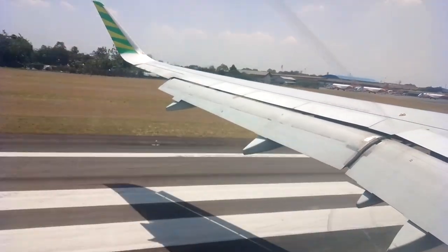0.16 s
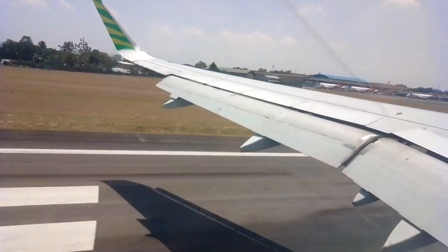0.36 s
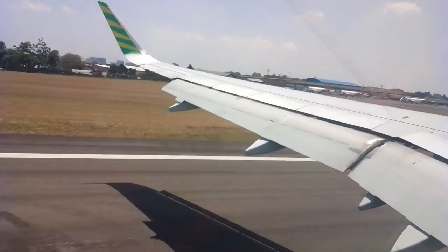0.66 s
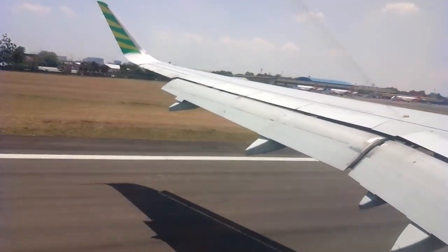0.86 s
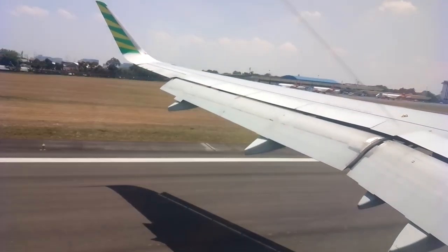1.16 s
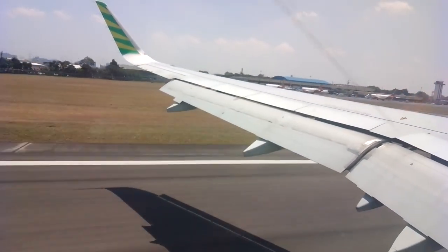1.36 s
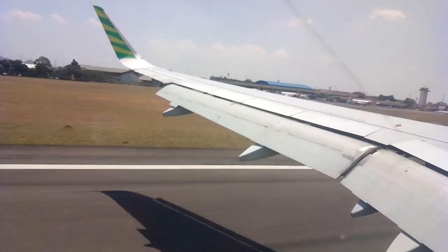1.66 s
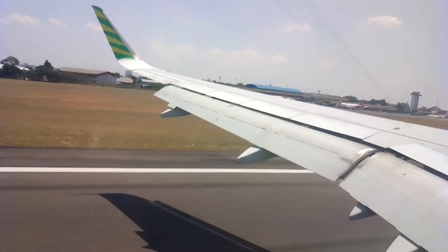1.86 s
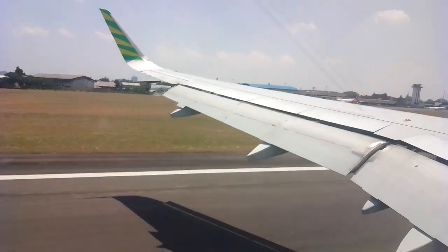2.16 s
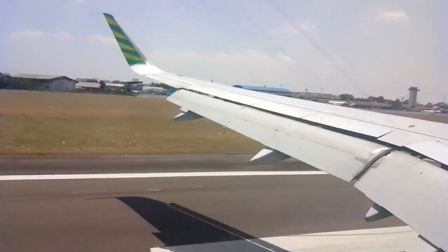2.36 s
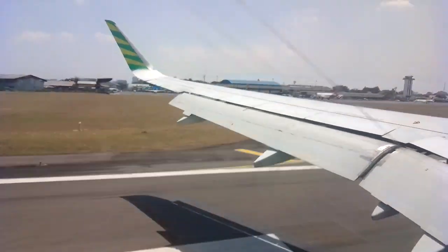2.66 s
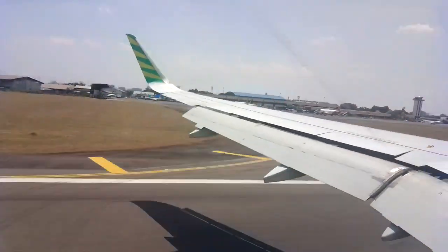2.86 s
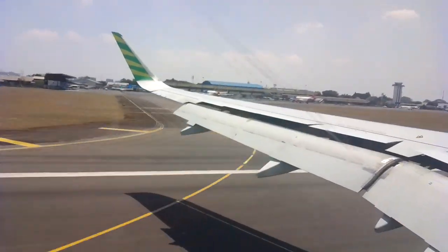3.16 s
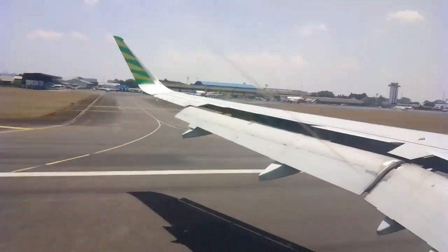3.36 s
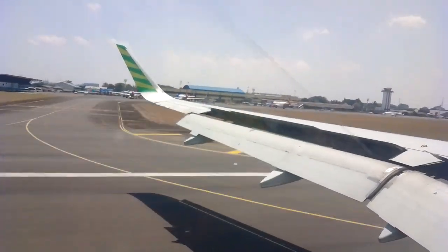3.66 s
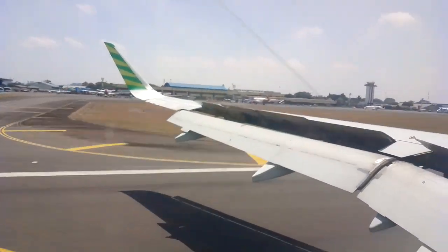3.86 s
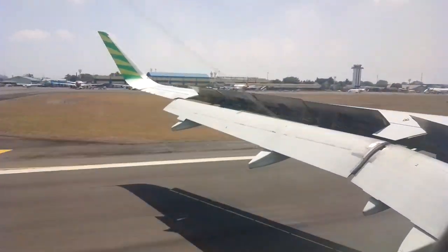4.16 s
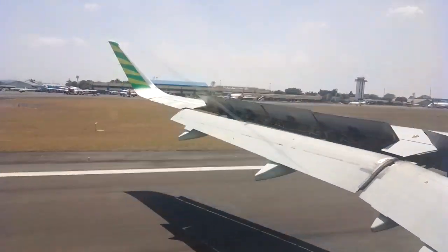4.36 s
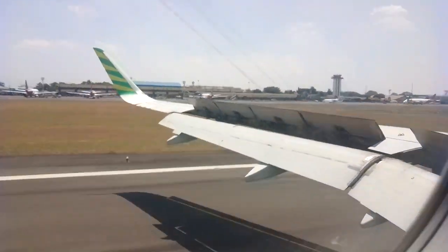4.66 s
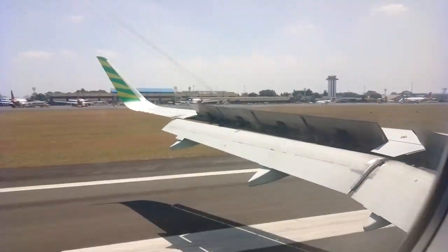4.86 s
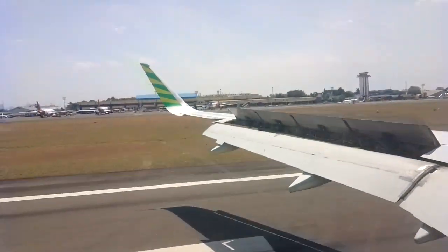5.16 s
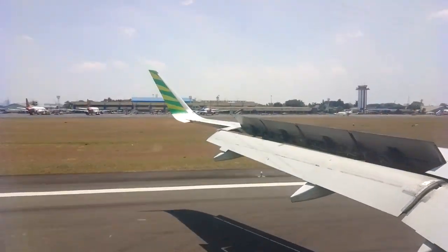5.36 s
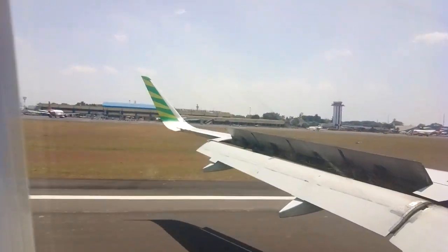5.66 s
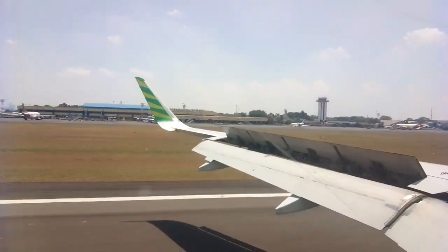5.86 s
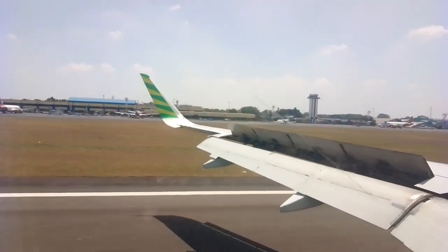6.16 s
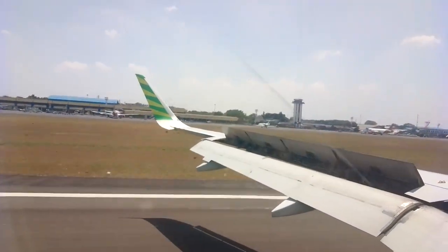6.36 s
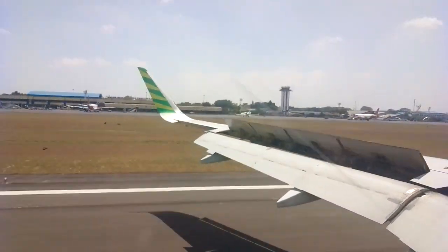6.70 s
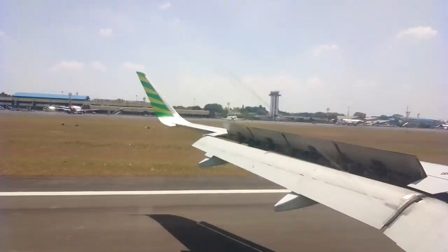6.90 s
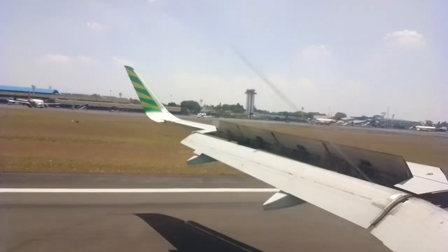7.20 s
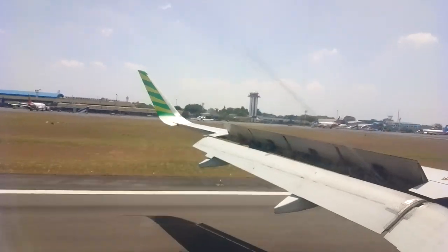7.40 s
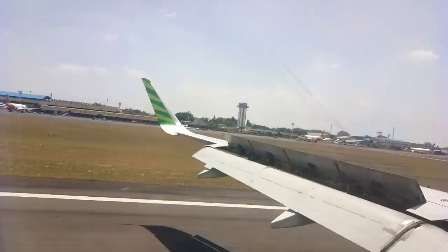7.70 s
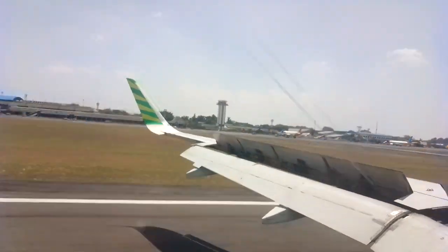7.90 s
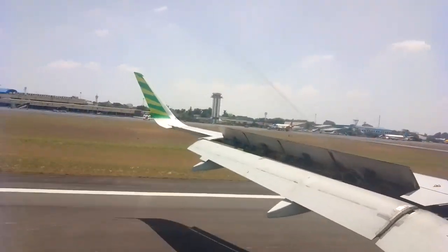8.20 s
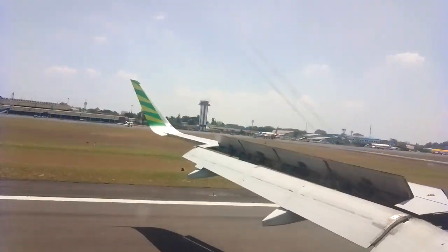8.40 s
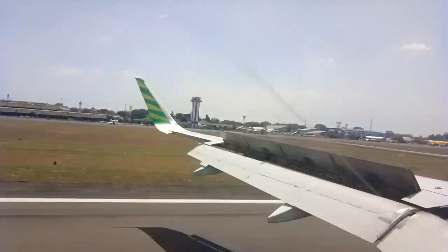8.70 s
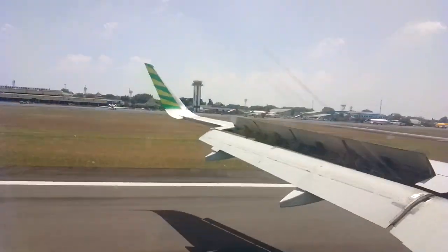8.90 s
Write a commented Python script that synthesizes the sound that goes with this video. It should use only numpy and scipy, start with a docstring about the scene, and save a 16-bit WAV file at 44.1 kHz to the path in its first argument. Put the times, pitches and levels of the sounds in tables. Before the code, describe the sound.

Continuous bass-heavy engine noise fills a jet cabin during the landing roll. Loose trim ticks, clacks and clatters, sparsely at first, then densely from two to five and a half seconds while the airframe throbs rapidly. Knocks thin out as reverse thrust builds a broad, rougher mid-range roar. A faint whistle and high vent hiss sit underneath; the handheld-style microphone overloads on the loud lows.

```python
"""Airliner cabin around touchdown

At the window over the wing, filtered noise gives a jet roar that swells with reverse thrust, a wheel rumble
and a hiss; narrow resonances whistle. The airframe shudders, which swings roar, hiss and steady rattle.
Jolts rattle loose fittings as bursts of noise, and knocks ring the modes of the plastic trim.
The loud bass overloads the microphone, a soft limiter that squashes most of the treble along with it."""
import sys
import numpy as np
from scipy import signal
from scipy.fft import rfft, irfft, next_fast_len
from scipy.io import wavfile
from scipy.ndimage import uniform_filter1d

SR = 44100
rng = np.random.default_rng(int(sys.argv[2]) if len(sys.argv) > 2 else 0)


def wrap_up_sound(samples):
    """Save the sound to the file named by the first command line argument, as 16-bit audio."""
    columns = np.atleast_2d(samples).T
    # keep every value between -1 and 1, then stretch to whole-number steps
    tamed = np.clip(columns, -1, 1)
    steps = np.round(tamed * 32767).astype(np.int16)
    wavfile.write(sys.argv[1], SR, steps)


N = 398663

# Levels over time, before shudder and overload.
# Each row: time in seconds, wheel rumble in dB, jet roar in dB, airflow hiss in dB.
ROLL_LEVELS = [(0, -22, -14.5, -42), (1.25, -18, -16, -43), (1.55, -29, -15, -45),
               (2.0, -22.5, -15.5, -43.5), (2.25, -17, -16.5, -39.5), (2.8, -16.5, -17, -45.5),
               (3.9, -17, -15.5, -44.5), (5.2, -15.5, -15.5, -43.5), (5.6, -15, -15.5, -43.5),
               (6.6, -20, -11.5, -45.5), (7.3, -20.5, -8.5, -40.5), (7.9, -15.5, -7, -40),
               (8.3, -18.5, -7, -42.5), (8.6, -8.5, -7.5, -39.5), (8.8, -18, -6, -44),
               (9.04, -15.5, -6.5, -45.5)]
# Steady rattle of the fittings. Each row: time in seconds, level in dB.
SHAKE_LEVELS = [(0, -55), (2.0, -46.5), (2.3, -45.5), (2.7, -43.5), (4.0, -56.5), (4.7, -48.5),
                (5.3, -48.5), (6.7, -50.5), (7.8, -47.5), (9.04, -45.5)]
# Whistle of the air. Each row: time in seconds, level in dB.
WHISTLE_LEVELS = [(0, -60.5), (2.05, -56.5), (2.1, -59.5), (2.4, -61), (2.6, -61), (2.9, -59),
                  (3.05, -64.5), (3.9, -66), (4.1, -73), (9.04, -78.5)]
# Blast of the reverse thrust. Each row: time in seconds, level in dB.
REVERSE_LEVELS = [(0, -67), (5.6, -56.5), (6.3, -48), (6.8, -41), (7.3, -38.5), (7.9, -36.5), (8.5, -36),
                  (9.04, -35.5)]
# Longer spells of clatter. Each row: middle in seconds, rattle level in dB, half length in seconds.
CLATTER_SPELLS = [(0.202, -41, 0.036), (0.339, -43.5, .02), (0.736, -49, .02), (1.573, -42, 0.035),
                  (2.19, -41, 0.033), (2.276, -37.5, 0.021), (2.362, -39, 0.029), (2.44, -39, 0.026),
                  (2.534, -39.5, 0.048), (2.7, -53, 0.026), (3.312, -40, 0.039), (3.591, -41.5, 0.046),
                  (3.856, -40.5, 0.023), (3.951, -34.5, 0.011), (4.05, -38, 0.013), (4.124, -42.5, 0.029),
                  (4.207, -40.5, .02), (4.3, -37, 0.038), (4.401, -39.5, .03), (4.655, -40.5, 0.016),
                  (4.7, -43.5, .04), (4.805, -42.5, .02), (4.892, -39.5, 0.015), (4.973, -40.5, .015),
                  (5.057, -39, 0.028), (5.15, -42, 0.035), (5.226, -34.5, 0.028), (5.427, -42, 0.01),
                  (5.546, -41.5, .015), (6.064, -43.5, .02), (8.065, -43.5, 0.053)]

# Relative noise spectra. Each row: frequency in Hz, level in dB per Hz.
RUMBLE_SPECTRUM = [(20, -36.5), (35, -14), (50, -4), (62, -6), (80, -8.5), (110, -16.5), (200, -35.5)]
ROAR_SPECTRUM = [(24, -39.5), (40, -5.5), (70, -6), (93, -5), (189, 1.5), (238, -5.5), (290, -4.5),
                 (417, -18.5), (563, -30.5), (667, -28.5), (750, -35), (811, -35), (900, -35.5),
                 (1170, -64.5), (1980, -120)]
HISS_SPECTRUM = [(260, -38), (450, -1), (573, -19.5), (687, -10), (775, -19), (987, -5), (1320, -22),
                 (1540, -14), (1840, -19), (2060, -15), (3310, -28), (4090, -32), (5000, -48), (6500, -70),
                 (11000, -120)]
RATTLE_SPECTRUM = [(300, -23), (600, 3), (1000, -0.5), (2000, -6), (3000, -11), (4600, -21.5),
                   (6000, -32.5), (6900, -33.5), (7700, -26.5), (8800, -35.5), (10000, -36), (12000, -39.5),
                   (13500, -43.5), (15000, -38), (17000, -32.5)]
VENT_SPECTRUM = [(3000, -23), (4600, 4), (5300, -3.5), (6000, -5.5), (6900, -8.5), (7700, -9),
                 (8800, -15.5), (10000, -16), (12000, -29), (13500, -22), (15000, -17.5), (17000, -16.5)]
BLAST_SPECTRUM = [(350, -34), (500, -5.5), (700, -3.5), (1000, -10), (1400, -12), (2000, -14.5),
                  (3000, -27), (4500, -45.5), (6000, -67.5)]

# Whistling bands. Each row: centre in Hz, width of each of two filter passes in Hz, relative level in dB.
WHISTLE_BANDS = [(4083, 280, -1), (6440, 150, -22.5), (7300, 460, -20.5)]
# Knocks on the trim. Each row: start in seconds, peak of the body in dB, pitch that favours the modes in Hz,
# peak of the treble crack in dB, contact length in seconds, spread (6 dB down) in octaves.
TRIM_KNOCKS = [(0.021, -20.5, 2100, -57, 0.0015, 0.56), (0.191, -24.5, 1600, -60, 0.003, 1.2),
               (0.194, -32, 2320, -63, 0.025, 0.61), (0.322, -22, 1980, -69, 0.0012, 0.66),
               (0.398, -29, 1500, -51, 0.002, 0.99), (0.583, -32, 1670, -62, 0.004, 0.33),
               (0.705, -30, 2040, -71, 0.031, 0.33), (0.717, -24.5, 800, -70, 0.025, 0.37),
               (1.4765, -20, 2680, -40, 0.0012, 0.29), (1.557, -33.5, 1900, -70, 0.011, 0.57),
               (1.575, -33.5, 2850, -61, 0.006, 0.7), (1.92, -16.5, 1750, -51, 0.0013, 0.66),
               (2.169, -21, 930, -60, 0.016, 0.4), (2.194, -21, 2000, -62, 0.0076, 0.6),
               (2.195, -22, 940, -70, 0.0093, 0.25), (2.211, -29, 970, -65, 0.026, 0.33),
               (2.263, -28, 1781, -57, 0.0058, 1.4), (2.292, -31, 1127, -54, 0.0031, 1.3),
               (2.322, -25, 2680, -45, 0.0024, 0.35), (2.35, -26, 1390, -52, 0.0023, 1.2),
               (2.4, -25.5, 2169, -56, 0.0025, 0.35), (2.442, -14, 2240, -58, 0.0011, 0.45),
               (2.436, -27, 350, -70, 0.001, 0.92), (2.46, -27.5, 2039, -53, 0.0044, 0.51),
               (2.544, -26, 1300, -60, 0.0064, 1.7), (2.605, -26, 1180, -57, 0.0026, 1.2),
               (2.624, -32, 3300, -64, 0.0027, 0.3), (2.6694, -6.5, 2000, -48, 0.0038, 0.99),
               (2.6700, -4, 265, -66, 0.001, 0.31), (2.671, -12, 900, -59, 0.009, 0.98),
               (2.678, -11.5, 1720, -47, 0.0031, 0.51), (2.746, -32.5, 1110, -54, 0.0084, 1.2),
               (3.06, -34, 950, -48, 0.0029, 0.9), (3.179, -34.5, 1200, -51, 0.0022, 0.77),
               (3.243, -26.5, 945, -54, 0.0066, 1.1), (3.304, -36, 3630, -62, 0.004, 0.22),
               (3.341, -22, 1836, -45, 0.0018, 0.89), (3.478, -26, 1001, -54, 0.0028, 0.75),
               (3.606, -30, 1350, -46, 0.0031, 1.0), (3.669, -23, 930, -48, 0.002, 0.68),
               (3.731, -33, 1300, -51, 0.0022, 0.89), (3.78, -23, 1990, -56, 0.0015, 0.5),
               (3.85, -29, 1000, -60, 0.0043, 1.2), (3.933, -21.5, 1840, -54, 0.0013, 0.64),
               (3.952, -31, 1640, -58, 0.011, 1.0), (3.96, -29, 1100, -57, 0.004, 1.1),
               (4.044, -27, 1130, -51, 0.01, 1.4), (4.114, -28, 1200, -64, 0.005, 1.0),
               (4.136, -20.5, 800, -49, 0.001, 1.5), (4.19, -27, 1760, -54, 0.016, 0.96),
               (4.253, -26, 1614, -61, 0.0012, 0.93), (4.29, -24, 1230, -52, 0.015, 1.3),
               (4.312, -26.5, 1670, -48, 0.0053, 1.15), (4.366, -25, 820, -52, 0.0024, 0.65),
               (4.412, -27, 1360, -59, 0.01, 1.3), (4.424, -26, 1200, -59, 0.002, 1.0),
               (4.495, -22.5, 800, -52, 0.0019, 1.34), (4.57, -37, 1500, -56, 0.0037, 1.0),
               (4.649, -29.5, 1040, -52, 0.0076, 0.92), (4.89, -33, 990, -48, 0.001, 1.1),
               (5.008, -23.5, 2050, -48, 0.0044, 0.82), (5.043, -32, 1362, -53, 0.0056, 1.1),
               (5.215, -24.5, 1550, -51, 0.025, 1.2), (5.259, -23.5, 1950, -63, 0.0018, 0.5),
               (5.299, -35.5, 2580, -67, 0.0069, 0.51), (5.428, -28, 1110, -65, 0.011, 1),
               (5.541, -33.5, 1370, -59, 0.012, 0.78), (5.546, -21.5, 700, -64, 0.003, 0.8),
               (5.863, -27, 1000, -52, 0.003, 1.2), (5.995, -13.5, 620, -52, 0.001, 1.1),
               (6.106, -32.5, 2020, -64, 0.002, 0.42), (6.187, -26.5, 1800, -63, 0.0016, 0.34),
               (6.247, -24, 1790, -62, 0.0017, 0.76), (6.326, -18.5, 800, -50, 0.0014, 1.04),
               (6.448, -28, 1950, -44, 0.0016, 0.81), (6.528, -32, 1403, -51, 0.0038, 1.4),
               (6.493, -27, 704, -68, 0.0035, 0.63), (6.675, -25, 900, -53, 0.002, 1.5),
               (6.773, -32, 2280, -64, 0.0039, 0.52), (6.831, -25.5, 1800, -53, 0.005, 0.7),
               (6.931, -38, 3900, -62, 0.003, 0.4), (6.994, -27, 2030, -68, 0.002, 0.6),
               (7.788, -25, 1510, -56, 0.0053, 1.0), (8.004, -38, 2530, -53, 0.0035, 1.0),
               (8.096, -32, 2500, -53, 0.0027, 0.87), (8.193, -30, 2480, -56, 0.0042, 0.84)]
# Nominal modes of the trim panels. Each row: frequency in Hz, relative level in dB, 60 dB decay in seconds.
TRIM_MODES = [(257, 4.5, 0.044), (398, -2.5, .035), (573, 2.5, 0.029), (758, 2, 0.051), (860, 1, 0.053),
              (1020, 5.5, 0.032), (1220, 2, 0.014), (1370, 0, 0.012), (1600, -1, 0.018), (1700, 3.5, 0.019),
              (2020, 6, 0.017), (2130, 3.5, 0.011), (2350, 2.5, 0.017), (2460, 3.5, 0.013),
              (2670, -1.5, 0.01), (2900, -8, 0.0083), (3280, -8.5, 0.0038), (3570, -6.5, 0.018),
              (3920, -12, .01), (4270, -11.5, .009), (4730, -10.5, 0.0065), (5130, -18, .008)]

VENT_DB = -69.5
JOLTS_PER_S, JOLT_DB, JOLT_T60_S, JOLT_RISE_S = 330, 2.5, 0.055, 0.0014
# fittings rattle on after each knock: drive relative to the knock's peak, smoothing, 60 dB decay
AFTER_DB, AFTER_RISE_S, AFTER_T60_S = -29.5, 0.0067, 0.023
# the airframe shudders after touchdown: rate, time of one crest, start, end, fade
SHUDDER_HZ, CREST_S, SHUDDER_FROM_S, SHUDDER_TO_S, SHUDDER_FADE_S = 11.4, 3.92, 2.13, 4.75, 0.23
ROAR_THROB_DB, HISS_THROB_DB, RATTLE_THROB_DB = 3.5, 1.8, 3
CRACK_HZ, CRACK_WIDTH_HZ = 7600, 1700
SHARP_S = 0.01  # a contact this long halves the first blow
TILT_DB = 4  # loss per octave: higher modes take less of the blow
SCRAPE_DB = -8  # toneless part of a knock against the ringing part
OVERLOAD, KNEE = 0.54, 9.2  # ceiling of the limiter, sharpness of its bend
BASS_TOP_HZ = 736  # the overload acts most fully below this
RIDE = 0.38  # share of the treble that escapes the overload
SHELF_HZ, SHELF_DB = 194, 3
MIC_HZ, TOP_HZ = 2.3, 15830  # low and high cutoff


def undb(db):
    """Logarithmic level: 20 dB is a factor of ten in amplitude."""
    return 10 ** (np.asarray(db) / 20)


def unit(x):
    """Normalisation by the root mean square."""
    return x / np.sqrt(np.mean(x ** 2))


def smooth_twice(x, length):
    """Moving average applied twice, which turns a step into a smooth slope."""
    return uniform_filter1d(uniform_filter1d(x, length), length)


def decay(x, t60_s):
    """Exponential decay: each impulse falls by 60 dB in t60_s."""
    return signal.lfilter([1], [1, -np.exp(-np.log(1000) / (t60_s * SR))], x)


def walk(rate):
    """Random modulation: levels held for 1 / rate seconds and smoothed, with a spread near 1."""
    held = int(SR / rate)
    levels = np.repeat(rng.standard_normal(N // held + 1), held)
    return 1.4 * smooth_twice(levels, held)[:N]


def curves(table):
    """Envelopes: amplitude over time, interpolated in dB between the rows."""
    s, *columns = np.transpose(table)
    return [undb(np.interp(np.arange(N) / SR, s, column)) for column in columns]


def coloured(points, flicker_db, rate):
    """Spectral shaping of white noise; each octave flickers in level independently."""
    size = next_fast_len(N)
    octaves = np.log2(np.maximum(np.arange(size // 2 + 1) * SR / size, 1))
    at, db = np.transpose(points)
    spectrum = undb(np.interp(octaves, np.log2(at), db, -120, -120))
    shaped = rfft(rng.standard_normal(size)) * spectrum
    out = 0
    for octave in range(int(np.log2(at[0])), int(np.log2(at[-1])) + 2):
        share = np.maximum(1 - np.abs(octaves - octave), 0)  # neighbouring bands sum to one
        out = out + irfft(shaped * share, size)[:N] * undb(flicker_db * walk(rate))
    return unit(out)


def resonance(x, hz, width_hz):
    """Resonance of two poles: a band-pass with gain 1 at the centre."""
    return signal.lfilter(*signal.iirpeak(hz, hz / width_hz, SR), x)


def shudder():
    """Amplitude modulation: a swing between -1 and 1 that fades in after touchdown and out again."""
    t = np.arange(N) / SR
    to_edge = np.minimum(t - SHUDDER_FROM_S, SHUDDER_TO_S - t)
    depth = np.clip(to_edge / SHUDDER_FADE_S + .5, 0, 1)
    return depth * np.cos(2 * np.pi * SHUDDER_HZ * (t - CREST_S))


def vent_hiss():
    """Broadband flow noise: a faint, steady hiss of high pitch."""
    return undb(VENT_DB) * coloured(VENT_SPECTRUM, 1.5, 22)


def whistle():
    """Flow resonance: air through narrow gaps sings in a few narrow bands."""
    air = rng.standard_normal(N)
    bands = 0
    for hz, width_hz, db in WHISTLE_BANDS:
        band = resonance(resonance(air, hz, width_hz), hz, width_hz)
        bands = bands + undb(db) * unit(band)
    return curves(WHISTLE_LEVELS)[0] * unit(bands) * undb(1.3 * walk(25))


def airflow_hiss(level):
    """Flow noise in the middle and upper range, its level modulated by the shudder."""
    return level * undb(HISS_THROB_DB * shudder()) * coloured(HISS_SPECTRUM, 0.53, 13)


def rattle_level():
    """Envelope of the rattle: a steady part, longer spells and a decaying burst that each knock sets off."""
    s, peak_db = np.transpose(TRIM_KNOCKS)[:2]
    blows = np.zeros(N)
    blows[(s * SR).astype(int)] = undb(peak_db + AFTER_DB)
    bursts = uniform_filter1d(decay(blows, AFTER_T60_S), int(AFTER_RISE_S * SR) + 1)
    t = np.arange(0, N, 40) / SR  # a coarse grid is enough for slow humps
    spells = sum(undb(db) * np.exp(-((t - mid) / half) ** 2) for mid, db, half in CLATTER_SPELLS)
    spells = np.interp(np.arange(N) / SR, t, spells)
    steady = curves(SHAKE_LEVELS)[0] * undb(RATTLE_THROB_DB * shudder())
    return np.hypot(steady, spells + bursts)


def rattle():
    """Random impacts: runway bumps shake fittings in short broad bursts, a few much stronger."""
    strength = undb(JOLT_DB * rng.exponential(size=N))
    jolts = (rng.random(N) < JOLTS_PER_S / SR) * strength
    shake = smooth_twice(decay(jolts, JOLT_T60_S), int(JOLT_RISE_S * SR) + 1)
    return rattle_level() * unit(shake * coloured(RATTLE_SPECTRUM, 0.87, 11.0))


def knocks():
    """Modal excitation: a scrape of contacts is heard itself and rings panel modes, plus a treble crack."""
    out, t = np.zeros(N + SR), np.arange(SR // 12) / SR
    hz, db, t60 = np.transpose(TRIM_MODES)[:, :, None]
    for s, peak_db, pitch_hz, crack_db, length, spread in TRIM_KNOCKS:
        chance_db, detune = rng.standard_normal((2, len(TRIM_MODES), 1))
        contact = rng.standard_normal((2, len(t))) * np.exp(-(t / max(length, 1e-4)) ** 2)
        contact[0, 0] = 9.3 / (1 + length / SHARP_S)  # a hard first blow, softer in long scrapes
        # where the blow lands decides which modes sound
        distance = np.log2(hz / pitch_hz)
        gain = undb(db + chance_db - 6 * (distance / spread) ** 2 - TILT_DB * distance)
        tones = np.sin(2 * np.pi * hz * (1 + .03 * detune) * t)
        ring = np.sum(gain * tones * 1000. ** (-t / t60), axis=0)
        # plastic is soft: the push holds little far above the pitch
        soft_hz = pitch_hz * 2 ** (0.4 + spread * 0.77)
        push = signal.sosfilt(signal.butter(4, soft_hz, fs=SR, output="sos"), contact[0])
        body = signal.fftconvolve(push, ring)[:len(t)]
        wide_hz = 1.6 * pitch_hz * spread
        scrape = resonance(resonance(push, pitch_hz, wide_hz), pitch_hz, wide_hz)
        body = body / np.abs(body).max() + undb(SCRAPE_DB) * scrape / np.abs(scrape).max()
        crack = resonance(np.diff(contact[1], prepend=0), CRACK_HZ, CRACK_WIDTH_HZ)
        k = int(s * SR)
        out[k:k + len(t)] += undb(peak_db) * body / np.abs(body).max()
        out[k:k + len(t)] += undb(crack_db) * crack / np.abs(crack).max()
    return out[:N]


def wheel_rumble(level):
    """Rolling noise: wheels on the runway give low-frequency noise."""
    return level * coloured(RUMBLE_SPECTRUM, 0.33, 3.0)


def reverse_blast():
    """Jet noise of the reverse thrust: a mid-range band that grows as the thrust sets in."""
    return curves(REVERSE_LEVELS)[0] * coloured(BLAST_SPECTRUM, 0.72, 8.8)


def jet_roar(level):
    """Jet noise booming in the fuselage: bass peaks in its spectrum, modulated by the shudder."""
    return level * undb(ROAR_THROB_DB * shudder()) * coloured(ROAR_SPECTRUM, 0.9, 9)


def scene():
    """Superposition: the pressures of all sources add."""
    wheels, jets, hiss = curves(ROLL_LEVELS)
    air = vent_hiss() + whistle() + airflow_hiss(hiss)
    loose_parts = rattle() + knocks()
    cabin = wheel_rumble(wheels) + reverse_blast() + jet_roar(jets)
    return (air + loose_parts + cabin)[None]


def record(dry):
    """Saturation: bass peaks overload the input and squash most of the treble; both band ends are cut."""
    high = signal.butter(2, BASS_TOP_HZ, "high", fs=SR, output="sos")
    treble = RIDE * signal.sosfilt(high, dry)
    # a shelf lifts the treble before the overload and lowers it after, so the flat tops slope upward
    low = 2 * np.pi * SHELF_HZ
    b, a = signal.bilinear([1 / (low * undb(SHELF_DB)), 1], [1 / low, 1], SR)
    hot = signal.lfilter(a, b, dry - treble)
    limited = hot / (1 + np.abs(hot / OVERLOAD) ** KNEE) ** (1 / KNEE)
    out = treble + signal.lfilter(b, a, limited)
    out = signal.sosfilt(signal.butter(1, MIC_HZ, "high", fs=SR, output="sos"), out)  # drops the offset
    return signal.sosfilt(signal.ellip(10, .2, 60, TOP_HZ, fs=SR, output="sos"), out)


dry = scene()
out = record(dry)
wrap_up_sound(out)
```